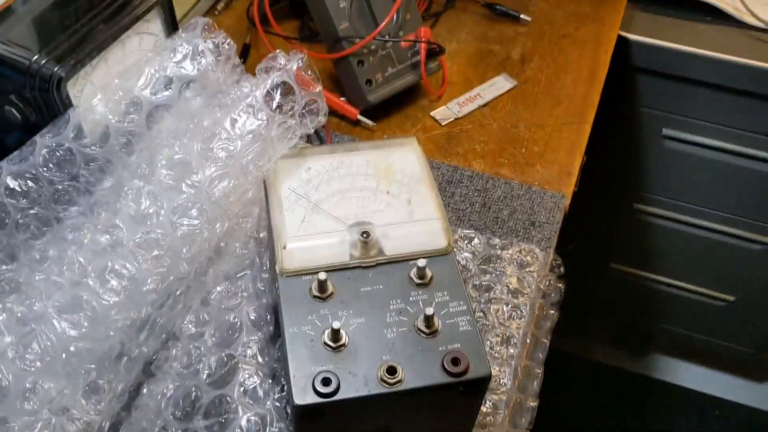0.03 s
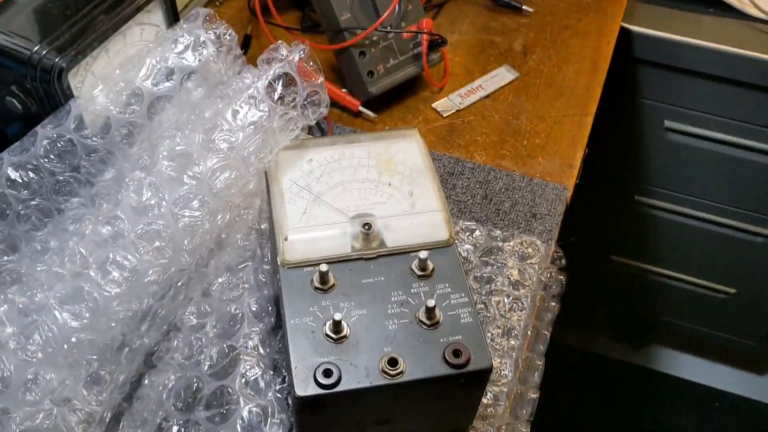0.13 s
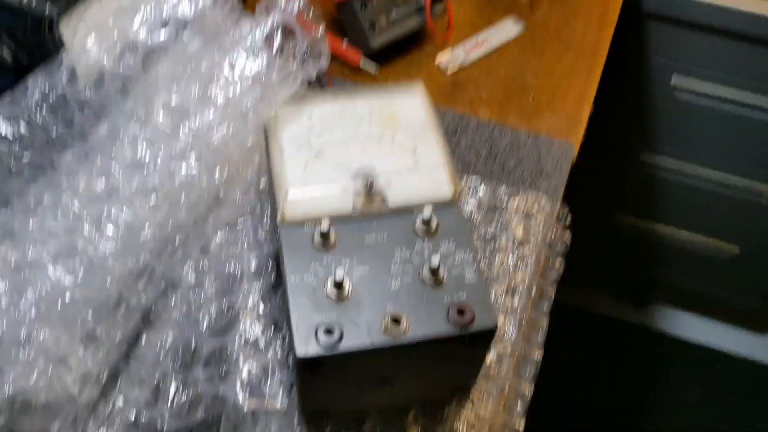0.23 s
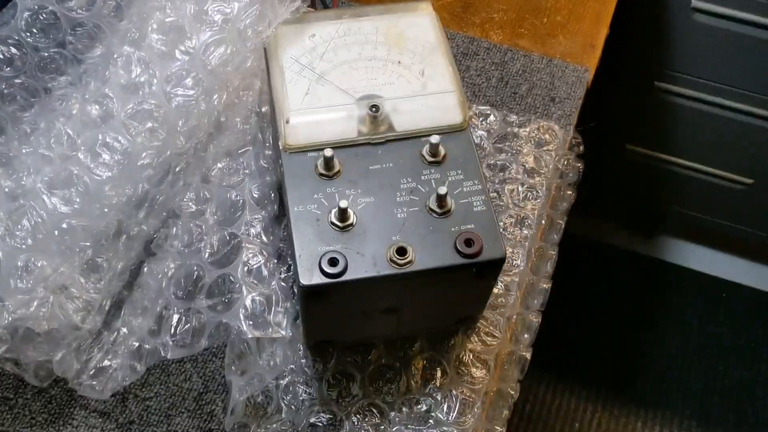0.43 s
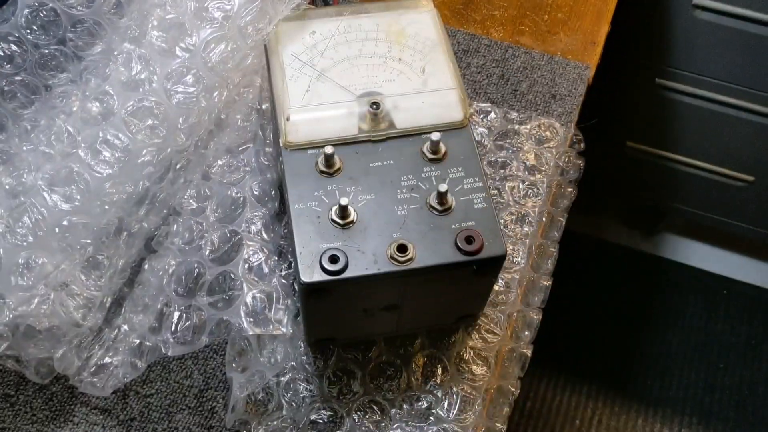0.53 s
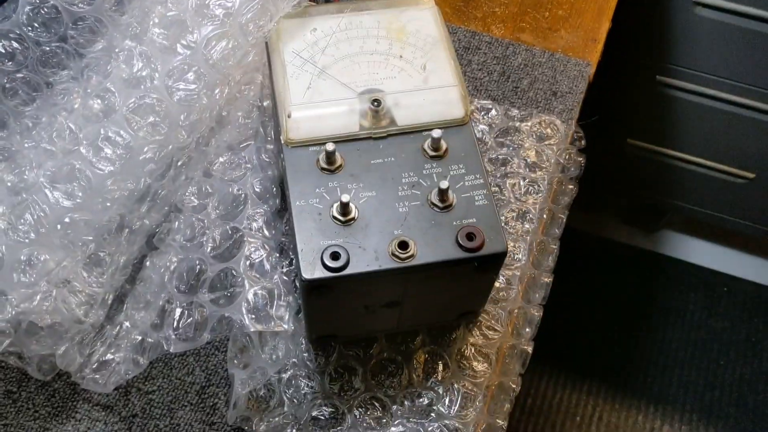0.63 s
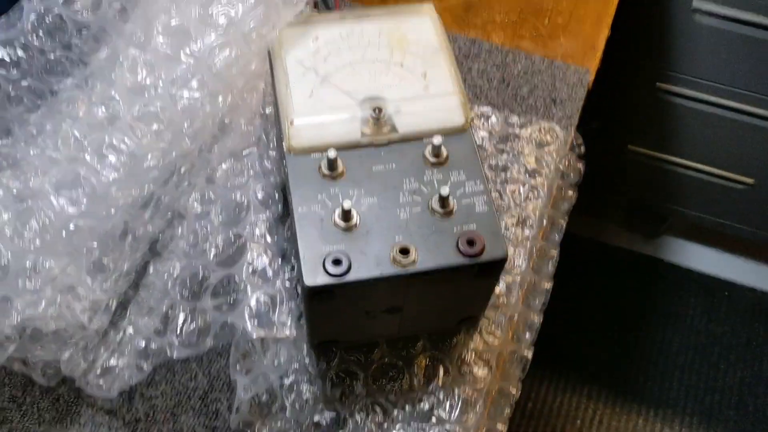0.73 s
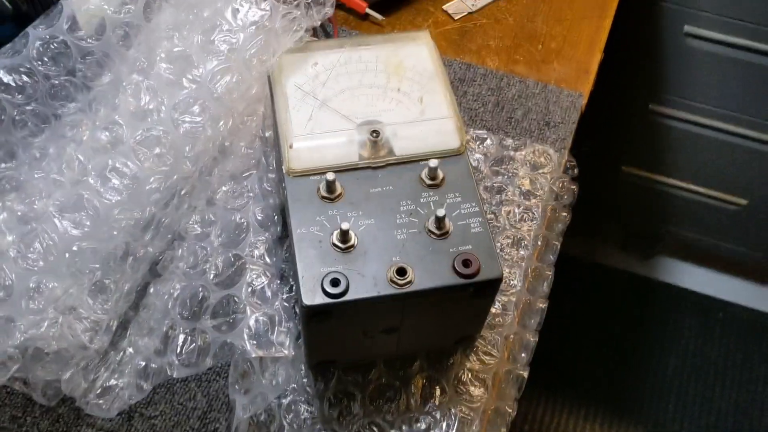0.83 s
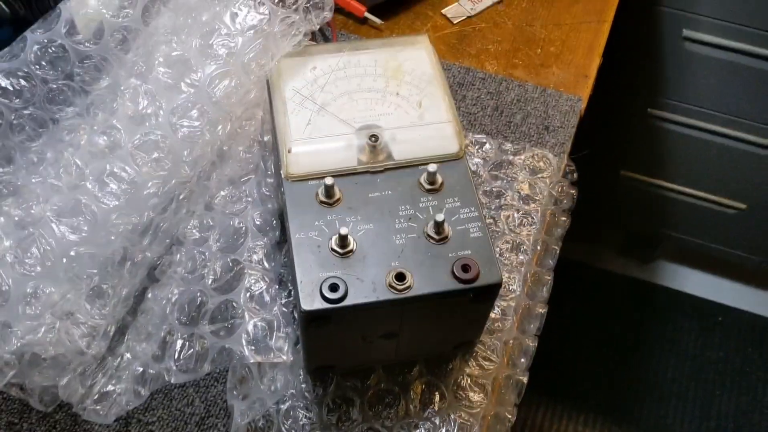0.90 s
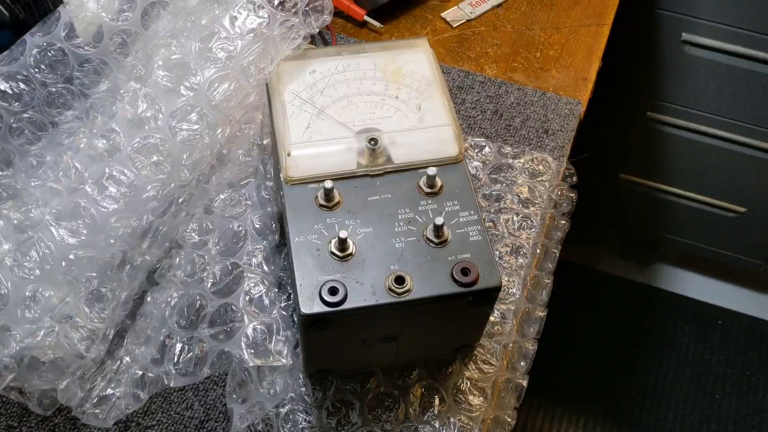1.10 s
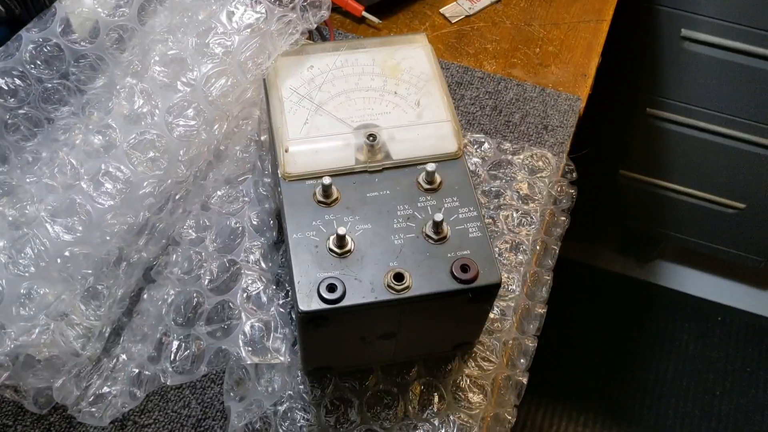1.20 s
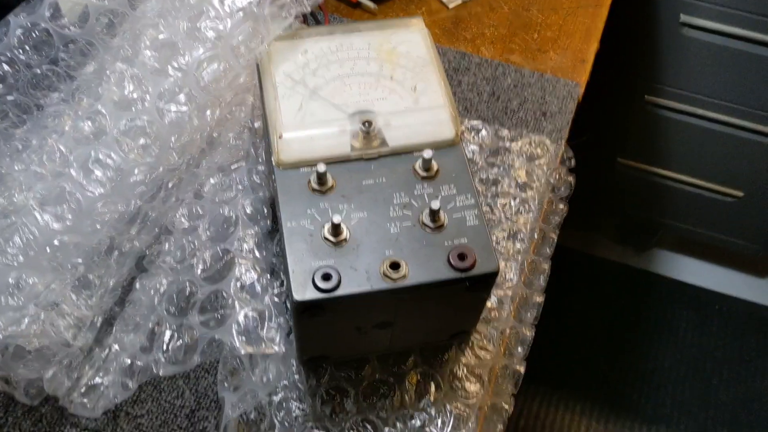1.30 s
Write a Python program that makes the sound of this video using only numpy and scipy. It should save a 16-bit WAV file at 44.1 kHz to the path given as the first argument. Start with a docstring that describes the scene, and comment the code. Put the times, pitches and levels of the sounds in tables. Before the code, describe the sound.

Something plastic is handled right by the microphone, giving a burst of sharp clicks, a second short burst, then a few softer ticks. The shifting grip adds light bumps and rustle over faint room hum and hiss.

```python
"""Sharp plastic clicks in three clusters, very close on the left: handling noise over a desk covered
in bubble wrap. Each click is an impulse that sets the damped modes of a small casing ringing.
The shifting grip adds soft thuds, rumble and rustle.
Behind it is a quiet room with mains hum and thin hiss."""
import sys
import numpy as np
from scipy import signal
from scipy.fft import rfft, irfft
from scipy.io import wavfile
from scipy.ndimage import uniform_filter1d

SR = 44100
rng = np.random.default_rng(int(sys.argv[2]) if len(sys.argv) > 2 else 0)


def store_wav(level_fs):
    """Save 16-bit WAV to argv[1]."""
    pcm = np.round(np.clip(np.atleast_2d(level_fs), -1, 1) * 32767)
    wavfile.write(sys.argv[1], SR, pcm.T.astype(np.int16))


N = 59535
SNAP_SAMPLES = 4096

# Plastic clicks: start_s, level_db, pitch_hz, ring_db (peak at that pitch), knock_db (lows),
# bright_db (highs), sizzle_db (top), right_db, casing_db (share sent into the casing)
CLICKS = [(0.1353, -29, 1760, 8, -3, 0, 13, -3, 6), (.1955, -33.5, 3000, -8, 2, -1, 19, -14, 15),
          (0.2207, 13, 4640, 4, 2.5, -3, 13.5, -11.5, -1.5),
          (0.2735, 1.5, 2060, 14, 2.5, 0.5, 7.5, -20, 2.5), (0.3465, -6, 3780, 6, -0.5, -2, -9, -10.5, 7.5),
          (0.3589, -17.5, 2180, 11, 0, -9, 12, 0, 10.5), (0.3667, 6.5, 2350, 12, 5.5, -12, -12, -18.5, -11),
          (.3807, -4.5, 1370, 9.5, 5, -33, -5, -23, -26), (.3858, -30, 3000, -14, -11, 6, 15, -10, -6),
          (0.417, -35.5, 3000, -7, -24, 10.5, 9, -4, 0), (0.439, -15.5, 2090, 3.5, -6, 3.5, -6, -13, 11.5),
          (0.4852, -34, 5000, 2, -6, 16.5, 8.5, -8, -7), (0.721, -36.5, 5020, 5, -8, 13.5, 8, -1, -5),
          (.8490, -1, 3670, 3.5, 1.5, 3.5, -6.5, -10, -0.5), (0.8586, -17, 4200, -4, 6, -9, -10, -9, 15),
          (.8700, -11.5, 2000, 3, -10, -11, -10, -8, -4),
          (0.8731, 5, 2160, 5.5, -0.5, -8.5, -4.5, -12, 4.5), (.9220, -27.5, 6500, 6, 3, 4, 5, -13, 18),
          (0.9299, -25.5, 4500, 8, -9, 4, -3, -4, 8), (0.9502, -20, 1757, 25, 3, -11, -1, -9, -7),
          (0.965, -22, 1670, 15, 2.5, -22, 3, -3.5, 6), (0.989, -24.5, 3000, 2, -11, 4.5, 8.5, -5, 8),
          (1.2930, -21.5, 2400, 10, 4, 12, 0, -8, -1), (1.3130, -12, 2060, 9.5, 5, 0, -22, 0, 5),
          (1.3165, -18.5, 4130, 8, 8.5, 4.5, 7.5, -30, 2), (1.321, -19, 3350, 6, 3, -5, -4, 1, 3),
          (1.3297, -20, 3300, 4, 7, -6, -14, -3, 0)]
# Spectral envelope common to all clicks: frequency_hz, gain_db
CLICK_SPECTRUM = [(60, -31.5), (250, -10), (480, -18), (720, -11.5), (830, -9.5), (1050, -2), (2000, -1.5),
                  (3000, -1), (4500, -5.5), (7000, -6.5), (9500, -15), (12500, -11), (16000, -15)]
# Extra colouring on the far, right side: frequency_hz, gain_db
FAR_SPECTRUM = [(200, 21.5), (500, 9), (1000, 1), (2000, -5.5), (3500, 5.5), (7000, -6.5), (10000, 7),
                (14000, -25)]
def clicks(snap_s=0.00053, far_snap_s=0.0012, far_delay_s=0.00025, slip_s=0.0011, slip_db=-21.5):
    """Impulsive excitation: brief snaps have broad spectra. Returns stereo clicks and casing drive."""
    stereo, drive = np.zeros((2, N)), np.zeros((1, N))
    hz = np.fft.rfftfreq(SNAP_SAMPLES, 1 / SR) + 1
    for start_s, level_db, pitch_hz, ring_db, knock_db, bright_db, sizzle_db, right_db, casing_db in CLICKS:
        colour_db = level_db + read(CLICK_SPECTRUM, hz)
        colour_db += ring_db / (1 + (np.log2(hz / pitch_hz) / 0.2) ** 2)  # half-width 0.2 octave
        colour_db += knock_db * (1 - shelf(hz, corner_hz=1260, order=6))
        colour_db += bright_db * shelf(hz, corner_hz=4500, order=6)
        colour_db += sizzle_db * shelf(hz, corner_hz=10100, order=12)
        rattle_db = -3.5 + 0.42 * casing_db  # grows with the share sent into the casing
        near = snap(colour_db, snap_s, rattle_db)
        slip = amp(slip_db) * snap(colour_db, snap_s, rattle_db)
        far = snap(colour_db + right_db + read(FAR_SPECTRUM, hz), far_snap_s, rattle_db)
        add(stereo[0], start_s - slip_s, slip)  # a faint slip just before the snap
        add(stereo[0], start_s, near)
        add(stereo[1], start_s + far_delay_s, far)
        add(drive[0], start_s, amp(casing_db) * near)
    return stereo, drive


def snap(colour_db, decay_s, rattle_db, rise_s=0.00034, rattle_s=0.0038, rattle_top_hz=5730):
    """Transient decay: a crack of about a millisecond gives way to a longer, duller rattle."""
    t = np.arange(SNAP_SAMPLES) / SR
    hz = np.fft.rfftfreq(SNAP_SAMPLES, 1 / SR) + 1
    crack, rattle = rng.standard_normal((2, SNAP_SAMPLES))
    crack *= (1 - np.exp(-t / rise_s)) ** 2 * np.exp(-t / decay_s)
    rattle *= (1 - np.exp(-t / decay_s)) * np.exp(-t / rattle_s)
    lowpass_db = -10 * np.log10(1 + (hz / rattle_top_hz) ** 3)
    return tinted(crack, colour_db) + tinted(rattle, colour_db + lowpass_db + rattle_db)


# Natural modes of the casing: pitch_hz, relative_db, t60_s
CASING_MODES = [(1085, -14, 0.052), (1407, 3.5, 0.11), (1580, 1.5, 0.14), (1757, 1, 0.15), (1854, -2, 0.18),
                (1960, -34, 0.093), (2120, -9.5, 0.17), (2450, -12.5, 0.3), (2551, 2.5, 0.061),
                (2842, -4.5, 0.2), (3080, -7, 0.09), (3270, -14, .06), (3460, -10, .05), (4480, -29, 0.024)]
def casing(drive, gain_db=-51, right_db=-19.5):
    """Modal resonance: after each click the casing rings as a sum of damped sinusoids."""
    t = np.arange(SR // 2) / SR
    response = np.zeros((2, len(t)))
    for side in response:
        for pitch_hz, relative_db, t60_s in CASING_MODES:
            side += amp(relative_db - 60 * t / t60_s) * np.sin(2 * np.pi * (pitch_hz * t + rng.random()))
    return amp(gain_db) * amp([[0], [right_db]]) * signal.fftconvolve(drive, response, axes=1)[:, :N]


# Reverberation time of the room: frequency_hz, t60_s
ROOM_DECAY = [(200, 0.16), (1500, 0.093), (4000, 0.081), (12000, 0.082)]
def room(direct, gain_db=-16.5, top_hz=7200):
    """Reverberation: a short, weak and dull diffuse tail whose treble dies before its bass."""
    hz, t, spectra = signal.stft(rng.standard_normal((2, SR // 2)), SR, nperseg=256)
    decay = amp(-60 * t / read(ROOM_DECAY, hz)[:, None])
    lowpass = 1 / np.sqrt(1 + (hz[:, None] / top_hz) ** 2)
    _, tail = signal.istft(spectra * decay * lowpass, SR, nperseg=256)
    tail /= np.linalg.norm(tail[0])
    return amp(gain_db) * signal.fftconvolve(direct, tail, axes=1)[:, :N]


# Soft thuds of the grip: start_s, level_db, pitch_hz, decay_s
THUDS = [(0.2218, -28.5, 277, 0.0071), (.236, -33.5, 144, 0.021), (0.274, -35.5, 164, .012),
         (0.348, -38, 268, 0.0057), (0.374, -38, 197, .01), (0.403, -41, 120, 0.022),
         (0.854, -33, 162, 0.011), (0.872, -36, 288, 0.0081), (0.876, -32.5, 143, 0.014),
         (0.983, -38, 116, 0.013), (1.299, -37, 147, 0.012), (1.329, -33, 141, 0.014)]
def thuds(rise_s=0.0015, left_db=-3.5, left_phase_rad=2.24):
    """Heavily damped oscillation: low bumps that reach the two sides out of phase."""
    stereo, t = np.zeros((2, N)), np.arange(SR // 6) / SR
    for start_s, level_db, pitch_hz, decay_s in THUDS:
        envelope = amp(level_db) * (1 - np.exp(-t / rise_s)) * np.exp(-t / decay_s)
        phase = 2 * np.pi * pitch_hz * t
        add(stereo[0], start_s, amp(left_db) * envelope * np.sin(phase + left_phase_rad))
        add(stereo[1], start_s, envelope * np.sin(phase))
    return stereo


# Spectrum of the grip's rumble: frequency_hz, relative_db
RUMBLE_SPECTRUM = [(15, -46), (25, -30), (42, 4.5), (92, 4.5), (134, 6), (200, 3), (356, -9.5),
                   (404, -11.5), (500, -35), (650, -35), (1100, -120)]
# Envelope of the rumble: time_s, level_db
RUMBLE_LEVELS = [(0, -57), (.06, -57), (.17, -57.5), (.26, -55), (.41, -51.5), (.55, -64), (.66, -56.5),
                 (.78, -53), (.9, -56.5), (1.0, -57.5), (1.12, -62), (1.27, -56), (1.35, -56.5)]
def rumble(antiphase_gain=0.49, left_db=-1.0):
    """Random vibration: the shifting grip makes low noise, partly in antiphase between the sides."""
    common = antiphase_gain * noise(RUMBLE_SPECTRUM)
    left = amp(left_db) * unit(noise(RUMBLE_SPECTRUM) - common)
    right = unit(noise(RUMBLE_SPECTRUM) + common)
    return np.array([left, right]) * level(RUMBLE_LEVELS)


# Spectrum of the rustle: frequency_hz, relative_db
RUSTLE_SPECTRUM = [(200, -1), (900, -4.5), (2000, 2.5), (4000, -3.5), (7000, -4), (10000, -5),
                   (13000, -12.5), (16000, -7.5)]
# Envelope of the rustle: time_s, level_db
RUSTLE_LEVELS = [(0, -62.5), (.2, -61), (.24, -49.5), (.35, -49.5), (.42, -55), (.5, -61), (.58, -65.5),
                 (.72, -61.5), (.83, -52), (.89, -56), (1.0, -64), (1.25, -66), (1.32, -49), (1.35, -56)]
# Faint rubs of the hand, and a short soft swell near 0.45 s: centre_s, width_s, level_db
RUBS = [(.07, .025, -65), (.15, .02, -65), (.688, .022, -58), (.449, .01, -56)]
# Spectrum of a rub: frequency_hz, relative_db
RUB_SPECTRUM = [(500, -29), (1100, -11.5), (1650, 1.5), (2300, -11), (4000, -13.5), (12000, -23)]
def friction(grain_db=1, rustle_left_db=-4, rub_right_db=-1.5):
    """Friction noise: the hand rustles and rubs, with a fine grain of random amplitude modulation."""
    t = np.arange(N) / SR
    flicker = unit(uniform_filter1d(rng.standard_normal(N), size=90))
    grain = unit(amp(grain_db * flicker))
    rustle = np.array([amp(rustle_left_db) * noise(RUSTLE_SPECTRUM), noise(RUSTLE_SPECTRUM)])
    rub = np.array([noise(RUB_SPECTRUM), amp(rub_right_db) * noise(RUB_SPECTRUM)])
    strokes = sum(amp(level_db) * bell(t, centre_s, width_s) for centre_s, width_s, level_db in RUBS)
    return grain * (rustle * level(RUSTLE_LEVELS) + rub * strokes)


# Partials of the mains hum: pitch_hz, level_db
HUM_PARTIALS = [(120, -70), (360, -69), (600, -70), (720, -84.5)]
def hum(right_phase_rad=0.52):
    """Harmonic series: steady mains tones at multiples of 120 Hz."""
    t = np.arange(N) / SR
    side_phase = np.array([[0], [right_phase_rad]])
    return sum(amp(level_db) * np.sqrt(2) * np.sin(2 * np.pi * (pitch_hz * t + rng.random()) + side_phase)
               for pitch_hz, level_db in HUM_PARTIALS)


# Spectral shape of the hiss: frequency_hz, left_db, right_db
HISS_SPECTRUM = [(40, -16, 19), (312, -11, 10), (470, 4, -19), (660, 13.5, 6.5), (950, 1.5, -1),
                 (1480, 5.5, 8), (3400, -1.5, -17.5), (6400, 6, 3.5), (9100, -9.5, 2.5), (11200, 3.5, 4),
                 (14140, 7.5, -14), (15900, -3, 0.5)]
# Narrow peaks on that shape: pitch_hz, width_hz, left_db, right_db
WHINES = [(4450, 94, 17, 20), (5720, 70, 3, 10), (6856, 70, 12, 15), (9060, 77, 18, 14), (14400, 110, 7, 0),
          (15100, 110, 8, 15)]
def hiss(level_db=-62):
    """Stationary broadband noise, whose narrow spectral peaks are heard as thin whines."""
    hz = np.fft.rfftfreq(N, 1 / SR)
    colour_db = np.array([read(np.array(HISS_SPECTRUM)[:, [0, side]], hz) for side in (1, 2)])
    for pitch_hz, width_hz, *sides_db in WHINES:
        colour_db += np.outer(sides_db, bell(hz, pitch_hz, width_hz))
    white = rfft(rng.standard_normal((2, N)))
    return amp(level_db) * unit(irfft(white * amp(colour_db), N))


def tinted(burst, colour_db):
    """Minimum-phase filtering: gives a burst a new spectral envelope and keeps its fine structure."""
    spectrum = rfft(burst)
    envelope_db = 10 * np.log10(uniform_filter1d(abs(spectrum) ** 2, size=71) + 1e-12)
    gain_db = colour_db - envelope_db
    log_gain = np.log(amp(np.r_[gain_db, gain_db[-2:0:-1]]))
    response = np.exp(np.conj(signal.hilbert(log_gain)))  # rings only forwards in time
    return irfft(spectrum * response[:len(spectrum)])


def noise(points):
    """Spectral shaping: white noise filtered to a given spectrum, at rms 1."""
    gain = amp(read(points, np.fft.rfftfreq(N, 1 / SR)))
    return unit(irfft(rfft(rng.standard_normal(N)) * gain, N))


def amp(db):
    """Decibels to amplitude ratio."""
    return 10 ** (np.asarray(db) / 20)


def unit(x):
    """Normalisation to rms 1."""
    return x / np.sqrt(np.mean(x ** 2) + 1e-20)


def read(points, hz):
    """Interpolation on a log-frequency axis."""
    frequency_hz, value = np.transpose(points)
    return np.interp(np.log(hz + 1), np.log(frequency_hz + 1), value)


def level(points):
    """Amplitude envelope, interpolated in decibels."""
    return amp(np.interp(np.arange(N) / SR, *np.transpose(points)))


def shelf(hz, corner_hz, order):
    """Shelving curve from 0 to 1 around a corner frequency."""
    return 1 / (1 + (corner_hz / hz) ** order)


def bell(x, centre, width):
    """Gaussian curve of height 1."""
    return np.exp(-((x - centre) / width) ** 2)


def add(mix, start_s, sound):
    """Superposition of a sound onto the mix at a given time."""
    part = mix[max(round(start_s * SR), 0):][:len(sound)]
    part += sound[:len(part)]


def scene():
    """Superposition: clicks with their ring and reverberation, over grip noise, hum and hiss."""
    direct, drive = clicks()
    return direct + casing(drive) + room(direct) + thuds() + rumble() + friction() + hum() + hiss()


def record(dry):
    """Band limiting: a high-pass at 44 Hz and a steep low-pass at 15.9 kHz."""
    highpass = signal.butter(2, 44, "highpass", fs=SR, output="sos")
    lowpass = signal.firwin(255, 15900, window=("kaiser", 8), fs=SR)
    return signal.oaconvolve(signal.sosfilt(highpass, dry), lowpass[None], "same")


dry = scene()
out = record(dry)
store_wav(out)
```